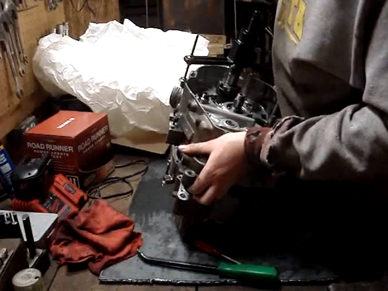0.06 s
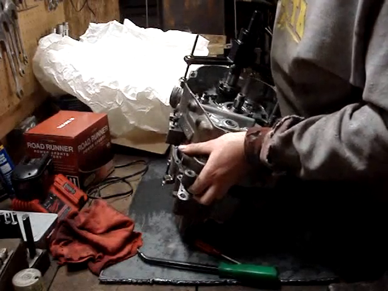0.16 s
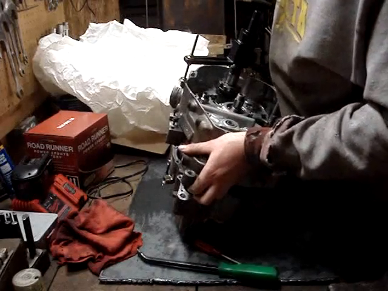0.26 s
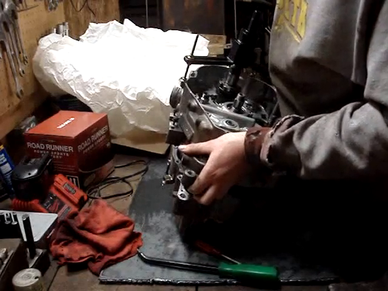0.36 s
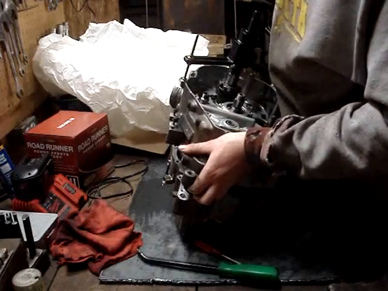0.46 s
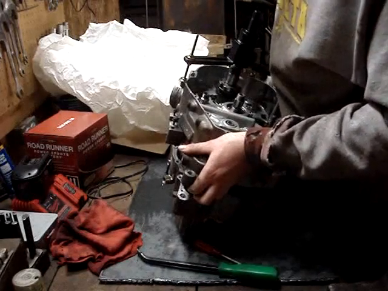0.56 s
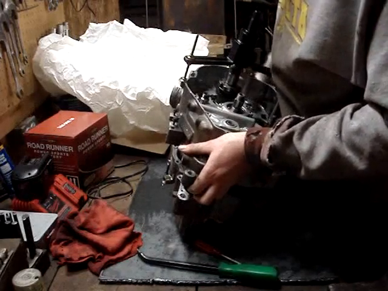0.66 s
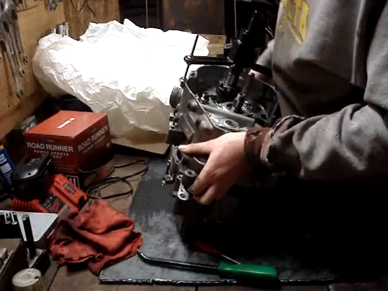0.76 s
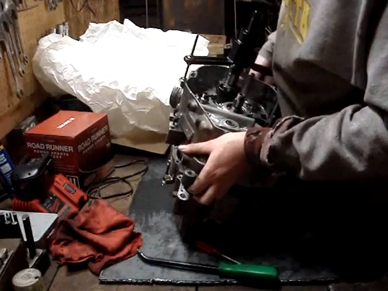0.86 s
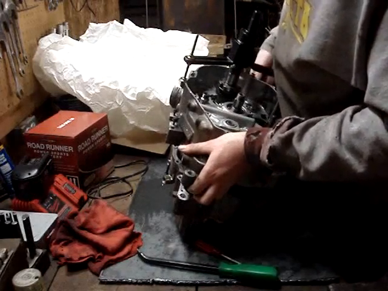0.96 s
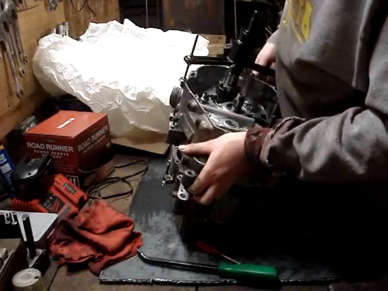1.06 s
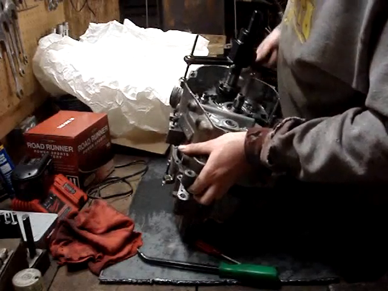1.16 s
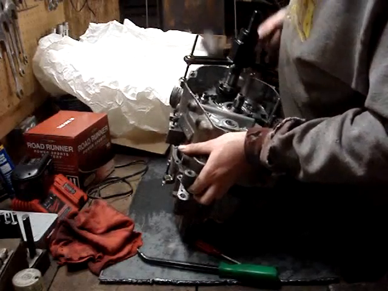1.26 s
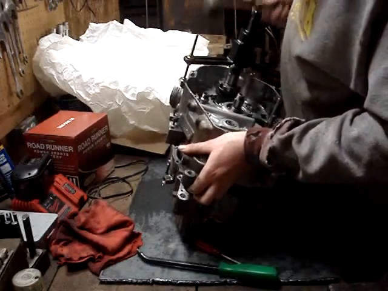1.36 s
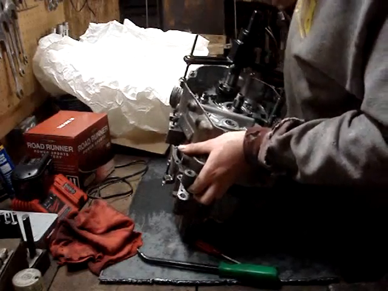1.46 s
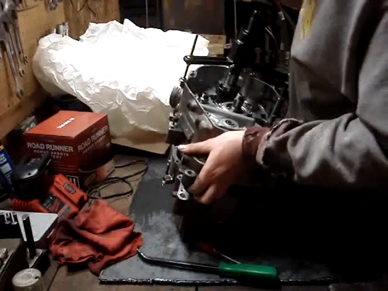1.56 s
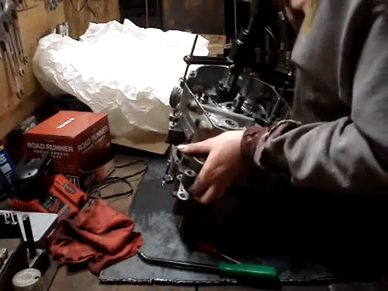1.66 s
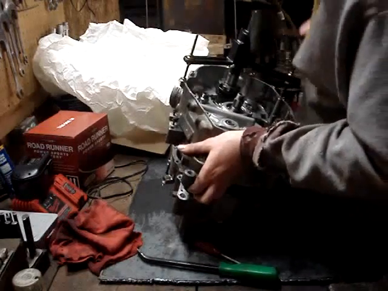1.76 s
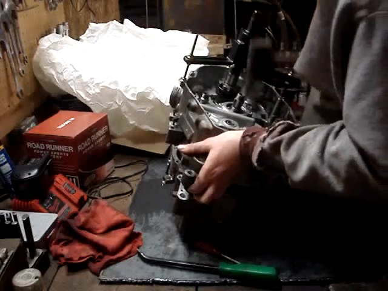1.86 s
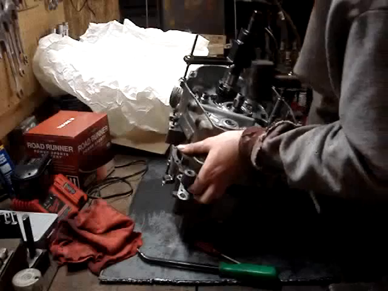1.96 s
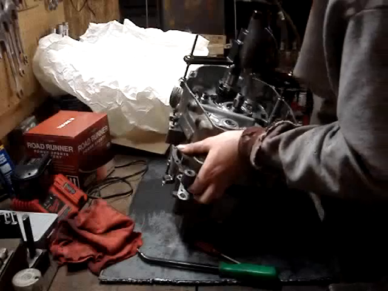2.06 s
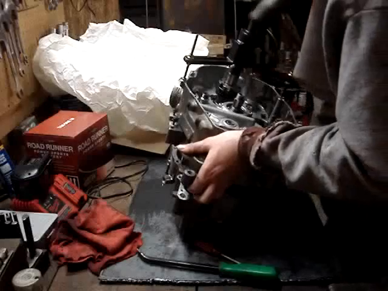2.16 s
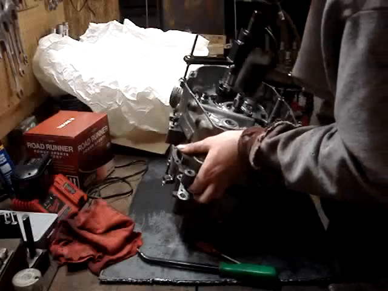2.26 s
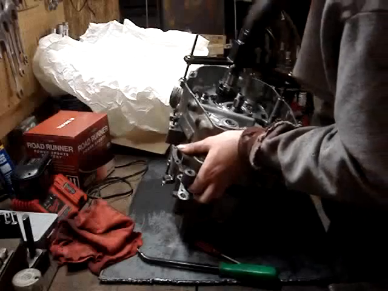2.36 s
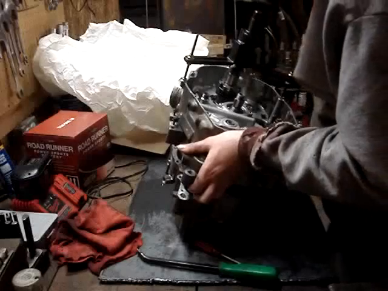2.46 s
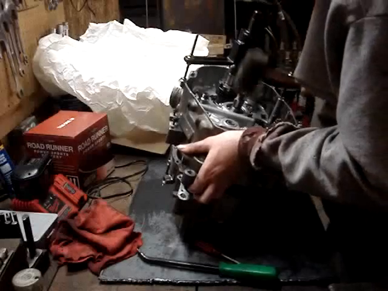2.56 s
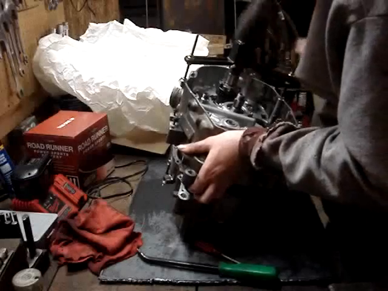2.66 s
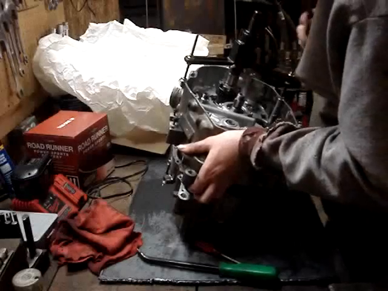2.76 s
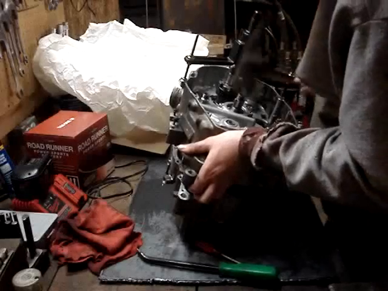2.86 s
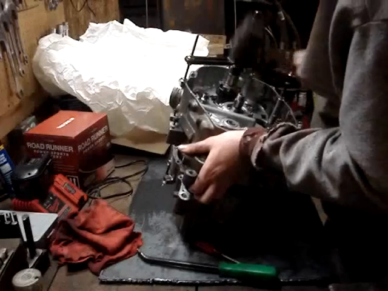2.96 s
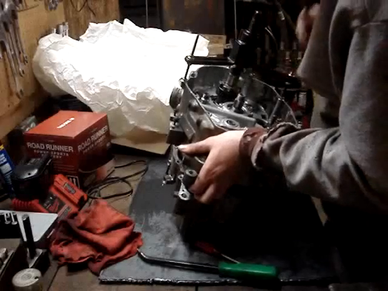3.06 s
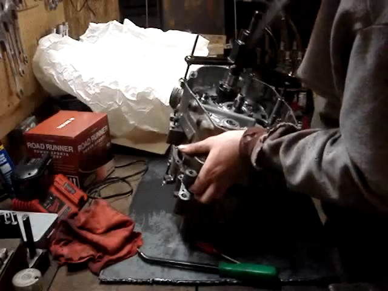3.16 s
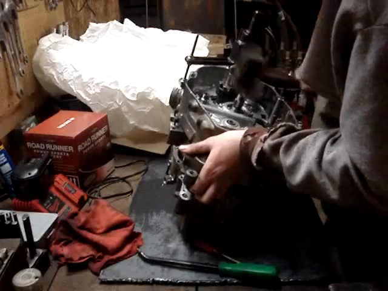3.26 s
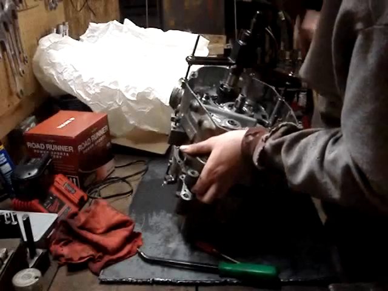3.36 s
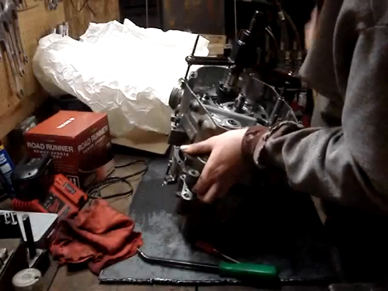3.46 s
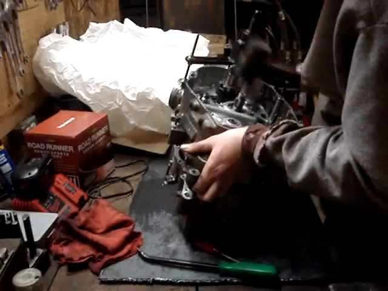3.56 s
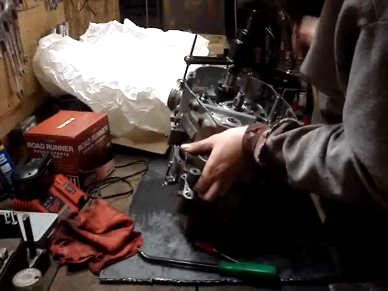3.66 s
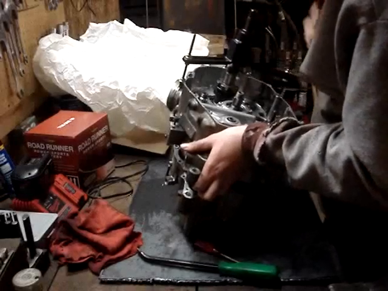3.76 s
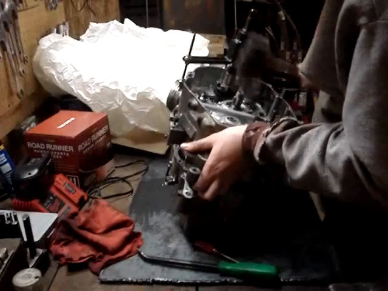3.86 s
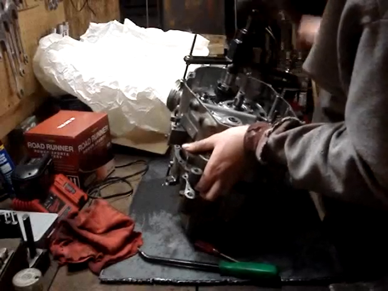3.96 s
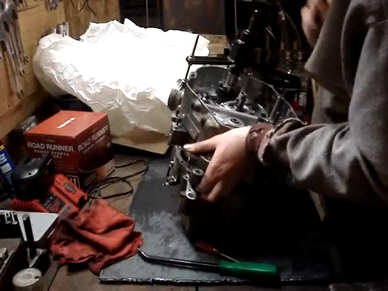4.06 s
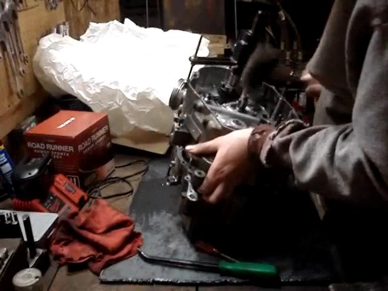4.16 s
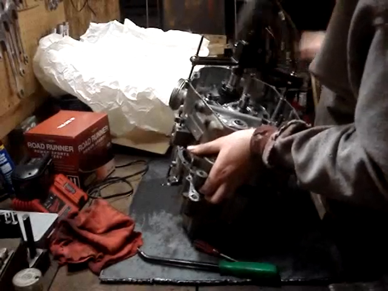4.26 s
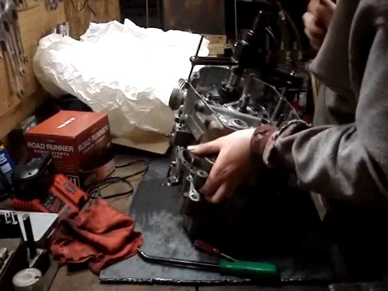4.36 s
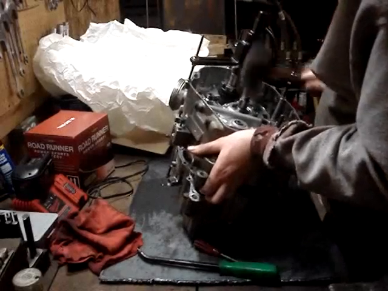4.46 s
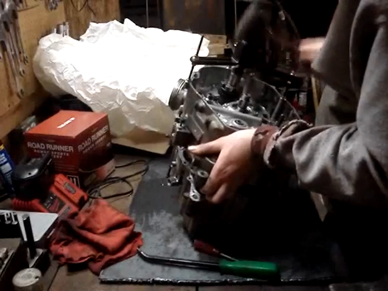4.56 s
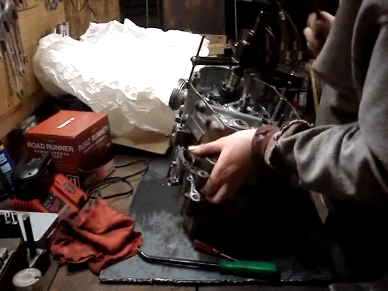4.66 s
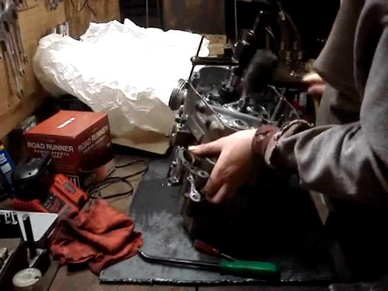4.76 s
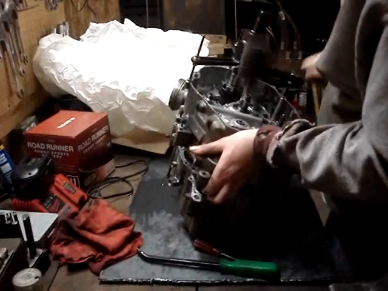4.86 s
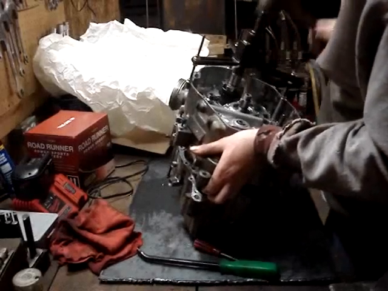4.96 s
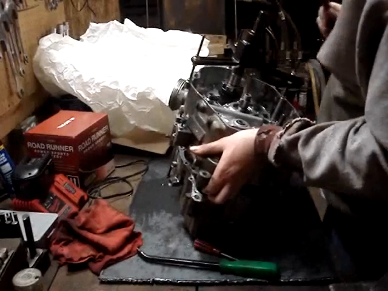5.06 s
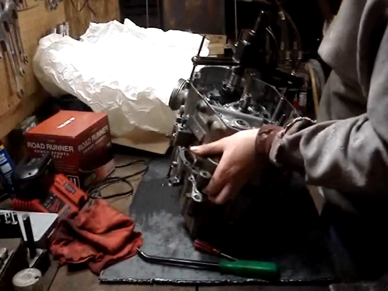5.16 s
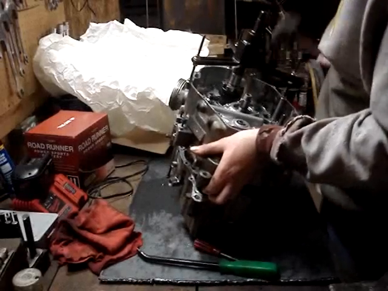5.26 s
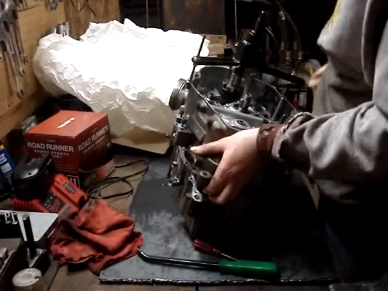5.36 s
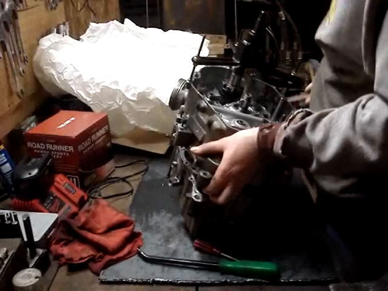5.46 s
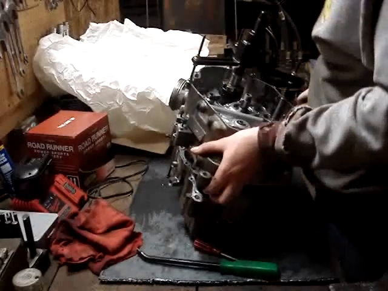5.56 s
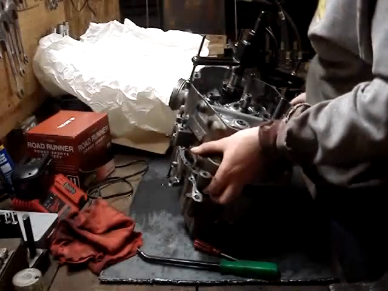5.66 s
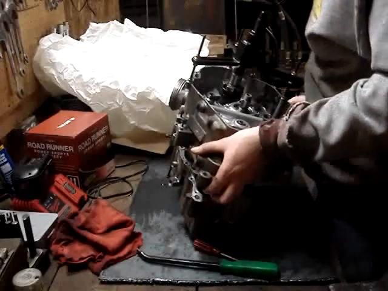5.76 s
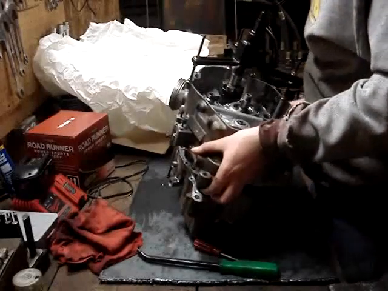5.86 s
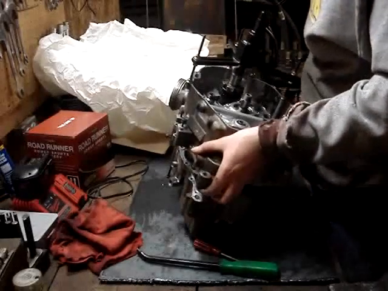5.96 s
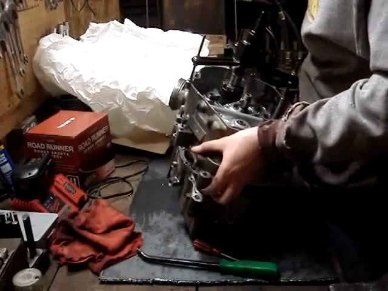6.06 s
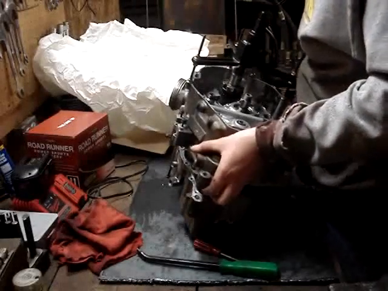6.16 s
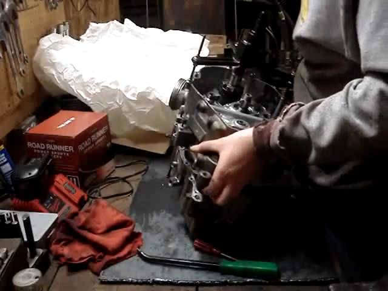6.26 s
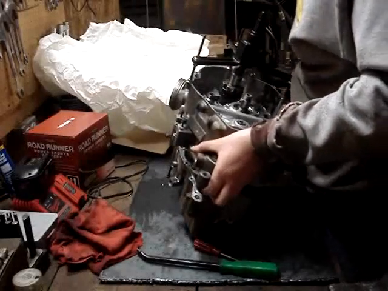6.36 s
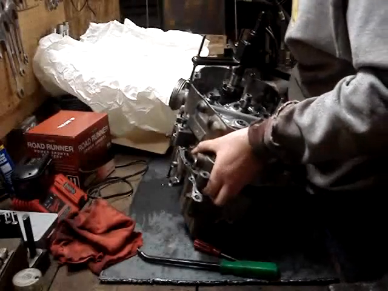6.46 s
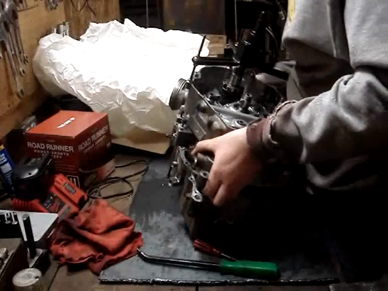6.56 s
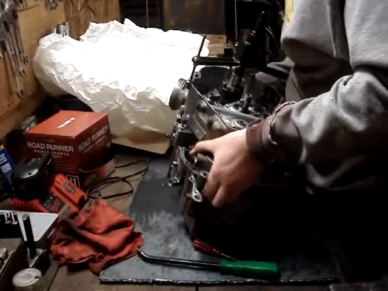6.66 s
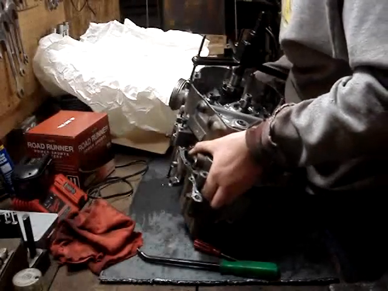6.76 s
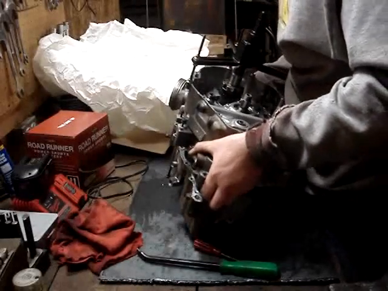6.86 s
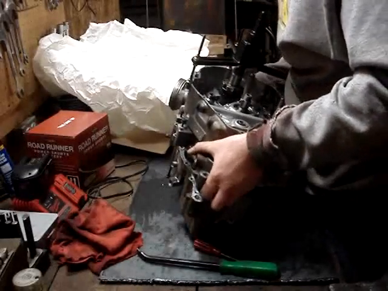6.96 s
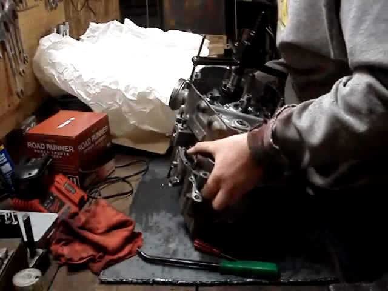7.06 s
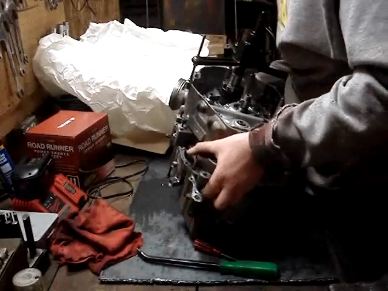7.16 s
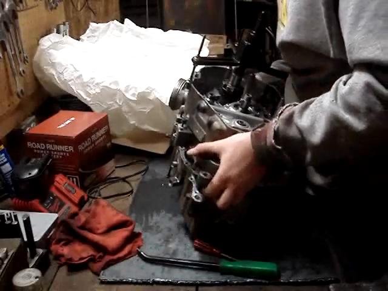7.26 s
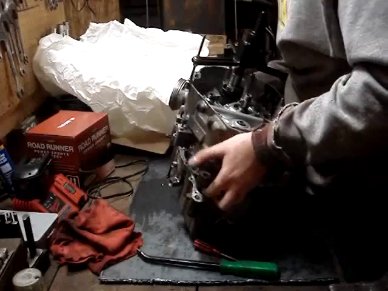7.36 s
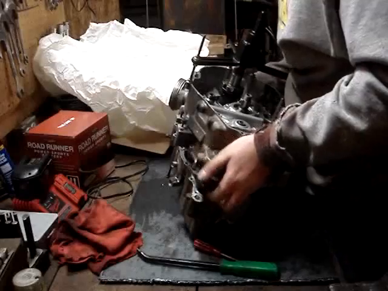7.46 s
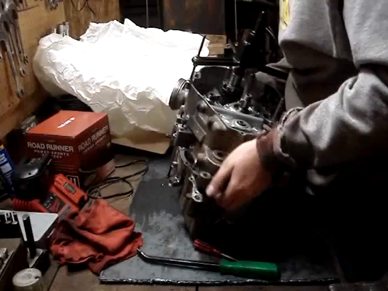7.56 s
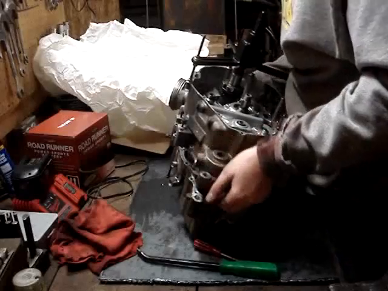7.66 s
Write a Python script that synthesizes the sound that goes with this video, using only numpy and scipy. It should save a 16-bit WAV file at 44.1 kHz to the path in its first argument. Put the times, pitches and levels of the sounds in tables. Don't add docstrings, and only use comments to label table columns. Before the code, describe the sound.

In a garage with a soft heater rush, a steel tool rings on a bench, then a mallet hammers a metal casting in quick, rattling blows.

```python
import sys
import numpy as np
from scipy import signal
from scipy.fft import rfft, irfft, next_fast_len
from scipy.io import wavfile
from scipy.ndimage import uniform_filter1d

SR = 44100
rng = np.random.default_rng(int(sys.argv[2]) if len(sys.argv) > 2 else 0)


def decibels_to_gain(level_db):
    exponent = np.asarray(level_db, float) / 20
    return 10 ** exponent


def master(y):
    cut = np.clip(np.atleast_2d(y).T, -1, 1)
    pcm = np.round(cut * 32767)
    wavfile.write(sys.argv[1], SR, pcm.astype(np.int16))


N = 339834


def unit(x):
    return x / np.sqrt(np.mean(x ** 2) + 1e-20)


def along(points, hz):
    f, v = np.transpose(points)
    return np.interp(np.log(hz + 1), np.log(f + 1), v)


def level_curve(rows):
    s, level_db = np.transpose(rows)
    return decibels_to_gain(np.interp(np.arange(N) / SR, s, level_db))


def filtered(x, response):
    m = next_fast_len(len(x) + 8192)
    return irfft(rfft(x, m) * response(np.fft.rfftfreq(m, 1 / SR)), m)[:len(x)]


def add(track, s, sound):
    part = track[round(s * SR):][:len(sound)]
    part += sound[:len(part)]


def ring(modes, t):
    out = np.zeros(len(t))
    for hz, db, t60 in modes:
        out += decibels_to_gain(db + rng.normal(0, 0.57) - 60 * t / t60) * np.sin(2 * np.pi * hz * t)
    return out


def lag(x, seconds):
    keep = np.exp(-1 / (seconds * SR))
    return np.abs(signal.lfilter([1 - keep], [1, -keep], x))


def stirred_by(loud, seconds):
    return np.sqrt(lag(loud ** 2, seconds))


def patchy(length, size, spread, patchy_db):
    z = signal.stft(rng.standard_normal(length + size), nperseg=size)[2]
    field = uniform_filter1d(rng.standard_normal(z.shape), spread, 0)
    field = uniform_filter1d(field, spread, 1)
    return signal.istft(z * decibels_to_gain(patchy_db * unit(field)), nperseg=size)[1][:length]


def shaped_noise(spectrum):
    return unit(filtered(rng.standard_normal(N), lambda f: decibels_to_gain(along(spectrum, f))))


# freq_hz [Hz], t60_s [s]
GARAGE_DECAY = [(100, 0.15), (260, 0.86), (700, 1), (1840, 0.86), (4850, 0.56), (10000, 0.34)]


def garage(x, wet_db):
    hz, t, z = signal.stft(rng.standard_normal(SR), SR, nperseg=256)
    decay = decibels_to_gain(-60 * t / along(GARAGE_DECAY, hz)[:, None])
    tail = signal.istft(z * decay, SR, nperseg=256)[1]
    tail *= 1 - np.exp(-np.arange(len(tail)) / (0.0079 * SR))
    wet = decibels_to_gain(wet_db) * signal.fftconvolve(x, tail / np.linalg.norm(tail))
    add(wet, 0, x)
    return wet


def camera_gain_db(loud):
    threshold_db, cut_db_per_db, attack_s, release_s = -30.5, 0.96, 0.045, 0.58
    heard = lag(lag(loud ** 2, attack_s), release_s)
    return -cut_db_per_db * 10 * np.log10(1 + heard / decibels_to_gain(threshold_db) ** 2)


# freq_hz [Hz], level_db [dB per Hz]
HEATER_SPECTRUM = [(88, -40), (150, -16.5), (263, -5), (302, 0.5), (337, -2.5), (496, -5), (546, -5),
                   (718, -5), (859, -3), (1570, -10.5), (2040, -22), (4000, -27), (5200, -39), (8800, -120)]


def rush():
    air = patchy(N, size=1024, spread=5, patchy_db=2.5)
    return unit(filtered(air, lambda f: decibels_to_gain(along(HEATER_SPECTRUM, f))))


def heater(gain_db):
    return decibels_to_gain(-37.5 + gain_db) * rush()


# start_s [s], level_db [dB]
HANDLING_LEVEL = [
    (0, -54),
    (.6, -40),
    (1.2, -36.5),
    (1.4, -50),
    (6.2, -65),
    (6.45, -38),
    (6.7, -56),
    (7.1, -40.5),
    (7.71, -47.5),
]


def rustle(loud):
    shudder_db, shudder_s = -18.5, 0.041
    stirred = level_curve(HANDLING_LEVEL) + decibels_to_gain(shudder_db) * stirred_by(loud, shudder_s)
    return stirred * rush()


# freq_hz [Hz], level_db [dB per Hz]
HISS_SPECTRUM = [(1180, -13.5), (2000, -0.5), (2170, -3), (8710, -21), (10100, -27), (10500, -30.5),
                 (13600, -88), (22000, -120)]


def hiss(gain_db, loud):
    sizzle_db, sizzle_s = -29, 0.084
    level = decibels_to_gain(-46.5 + 0.56 * gain_db) + decibels_to_gain(sizzle_db) * stirred_by(loud, sizzle_s)
    return level * shaped_noise(HISS_SPECTRUM)


# freq_hz [Hz], level_db [dB per Hz]
RUMBLE_SPECTRUM = [(12, -20), (20, 0.5), (43, -18), (81, -11), (141, -9), (170, -6), (220, -28),
                   (370, -120)]


def rumble(gain_db):
    return decibels_to_gain(-56.5 + 2.9 * gain_db) * shaped_noise(RUMBLE_SPECTRUM)


def bench_legs(loud):
    boom_db, boom_hz, boom_s = -39.5, 81, 0.017
    noise = rng.standard_normal(N)
    boom = unit(filtered(noise, lambda f: f / boom_hz / (1 + (f / boom_hz) ** 4)))
    return decibels_to_gain(boom_db) * stirred_by(loud, boom_s) * boom


def background(loud):
    gain_db = camera_gain_db(loud)
    return heater(gain_db) + rustle(loud) + hiss(gain_db, loud) + rumble(gain_db) + bench_legs(loud)


# start_s [s], level_db [dB, peak], pitch_hz [Hz]
BENCH_THUDS = [(.5405, -17, 480), (.546, -19, 330), (.552, -21, 650), (.6, -30, 190), (.35, -29, 310),
               (.72, -30, 900), (.8286, -11, 1100), (7.078, -33, 600), (6.298, -24, 270), (6.325, -24, 290),
               (1.056, -17, 180), (1.0616, -17, 180), (1.0672, -19, 180), (1.0551, -2.5, 390),
               (1.0625, -11, 300), (1.068, -12, 420), (1.06, -17, 650), (1.075, -19, 620),
               (1.0712, -8, 330), (1.079, -16, 400)]

# start_s [s], level_db [dB]
DRAG_LEVEL = [
    (6.25, -71),
    (6.36, -60),
    (6.45, -50),
    (6.52, -68),
    (6.6, -69),
]


def bench():
    out, t = np.zeros(N), np.arange(SR // 8) / SR
    for s, db, hz in BENCH_THUDS:
        push = np.sin(2 * np.pi * hz * t) * np.exp(-((t * hz - .9) / 0.77) ** 2)
        add(out, s, decibels_to_gain(db) * garage(push, wet_db=-29.5))
    drag = filtered(rng.standard_normal(N), lambda f: 1 / (1 + ((f - 85) / 20) ** 2))
    return out + level_curve(DRAG_LEVEL) * unit(drag)


# level_db [dB], t60_s [s], brightness
# [dB per octave], favoured_hz [Hz]
SHAKEN_PARTS = [(-10.5, 0.26, .5, 3500), (-15, 0.044, -5.5, 2000), (-11, 0.14, -1.5, 3150),
                (-12.5, 0.3, 1, 3700), (-12, 0.16, 2.5, 2380), (-11, 0.2, -0.1, 3150),
                (-12, 0.25, -2, 3550), (-14.5, 0.41, 0, 3400), (-12.5, 0.21, -3, 2540),
                (-12.5, 0.28, -2, 3600), (-22, 0.51, -3, 3700), (-11, 0.16, -1.5, 1600)]

# start_s [s], level_db [dB], t60_s [s], favoured_hz [Hz]
LANDINGS = [(1.114, -13, 0.36, 5930), (1.149, -18, 0.25, 2840), (2.411, -21, 0.13, 3240),
            (2.74, -16.5, .15, 4550), (3.058, -16.5, 0.28, 5400), (3.388, -20, 0.43, 2640),
            (3.706, -16.5, 0.47, 2580), (4.023, -19.5, 0.39, 5600), (4.327, -14, 0.12, 2150),
            (4.362, -17.5, 0.27, 5720), (4.639, -15.5, 0.35, 6440), (4.663, -22, 0.11, 5100),
            (4.941, -19.5, 0.26, 5600), (6.309, -18, 0.13, 5730), (6.322, -19, 0.12, 4200),
            (6.345, -24, 0.18, 5640), (6.537, -29, 0.083, 1300)]

# start_s [s], level_db [dB], brightness [dB per octave], favoured_hz [Hz]
STRAY_TICKS = [
    (.408, -38, -4, 4000),
    (.548, -26, -7.5, 2130),
    (0.827, -43, 0, 6460),
    (1.062, -36.5, 6, 5040),
    (7.64, -40, 6.5, 7850),
]


def chatters():
    clumps = []
    for blow, (db, *rest) in zip(BLOWS_STRUCK, SHAKEN_PARTS):
        clumps.append((blow[0], db, 0.02, *rest))
    for s, db, t60, hz in LANDINGS:
        tilt_db = 0.34 + 1.9 * np.log2(hz / 4000)
        clumps.append((s, db, .021, t60, tilt_db, hz))
    for s, db, *rest in STRAY_TICKS:
        clumps.append((s, db, 0.0067, 0.11, *rest))
    return clumps


# freq_hz [Hz], level_db [dB per Hz]
CHATTER_SPECTRUM = [(88, -49), (150, -27), (511, -7.5), (579, -3.5), (704, -3), (1310, -4.5), (1540, -2),
                    (4890, -6), (9440, -20), (10500, -30), (13600, -55), (22000, -120)]

# freq_hz [Hz], width_hz [Hz], level_db [dB over the chatter]
CASTING_MODES = [(581, 22, 3), (913, 30, -2), (1297, 40, -1), (1850, 40, -6), (2145, 18, -2),
                 (2500, 36, -6), (2737, 30, -4), (3060, 34, -5), (3600, 30, -4), (3896, 25, -3),
                 (4333, 30, -3), (4806, 36, 0), (5430, 30, -5), (5810, 30, -4), (6008, 22, -4),
                 (6359, 40, -2), (7520, 40, -5), (9500, 700, -6)]


def rattle():
    favour_db, favour_octaves = 4.5, 0.14
    out, t = np.zeros(N), np.arange(SR // 2) / SR
    centre, width, level_db = np.transpose(CASTING_MODES)[..., None]
    for s, db, hold, t60, tilt_db, favoured_hz in chatters():
        def favour(f):
            return favour_db * np.exp(-(np.log2((f + 1) / favoured_hz) / favour_octaves) ** 2)

        fed_db = level_db + rng.normal(0, 1.5, level_db.shape) + favour(centre)

        def body(f):
            band = 1j * f * width
            return 1 + np.sum(decibels_to_gain(fed_db) * band / (centre ** 2 - f * f + band), axis=0)

        def colour(f):
            tilt = tilt_db * np.log2((f + 50) / 2000)
            return decibels_to_gain(along(CHATTER_SPECTRUM, f) + tilt + favour(f))

        taps = unit(filtered(patchy(len(t), size=256, spread=4, patchy_db=2.5), colour))
        shape = (1 - np.exp(-t / 0.00086)) * decibels_to_gain(-60 * np.clip(t - hold, 0, None) / t60)
        add(out, s, decibels_to_gain(db - 3.5) * garage(filtered(taps * shape, body), wet_db=-9.0))
    return out


# freq_hz [Hz], beat_hz [Hz], t60_s [s], share [second part over first, before
TOOL_MODES = [(910, 10.5, .45, .6), (1195, 12.3, .9, .7), (2278, 9, 1.0, .12), (2690, 8, .4, .5)]

# start_s [s], mode1_db, mode2_db, mode3_db [dB], knock_db [dB]
TOOL_NUDGES = [
    (.528, -53, -52, -28, -49),
    (.542, -15, -55, -27.5, -21),
    (.828, -13, -11.5, -31, -11.5),
    (6.325, -52, -19, -53, -49),
]


def tool():
    out, t = np.zeros(N), np.arange(SR // 2) / SR
    dull_modes = [(339, -16.5, 0.071), (625, -16, 0.06), (1034, 7, 0.015), (1300, -15.0, 0.042)]
    for s, *levels, knock_db in TOOL_NUDGES:
        levels = [*levels, min(levels) - 2.5]
        sound = decibels_to_gain(knock_db) * ring(dull_modes, t)
        for db, (hz, beat_hz, t60, share) in zip(levels, TOOL_MODES):
            second = min(share, 1) * np.exp(2j * np.pi * beat_hz * (t - .031))
            carrier = np.exp(2j * np.pi * (hz - beat_hz * share) * t)
            cluster = np.imag(carrier * (1 + second) ** 2 / 2)
            sound += decibels_to_gain(db - 7.5 - 60 * t / t60) * cluster
        add(out, s, garage(sound * (1 - np.exp(-t / .0005)), wet_db=-20))
    return out


# [Hz, bench]
BLOWS_STRUCK = [(1.086, -9, -28, -20, 637), (2.403, -8, 0.5, -0.5, 527), (2.702, 3.5, -10, -10, 563),
                (3.022, 7.5, -24, -12.5, 617), (3.346, 12.5, -26.5, -20.5, 474), (3.676, -2, -15, -2, 650),
                (3.99, 3.5, -10.5, -2, 613), (4.3018, -0.5, -6, -0.5, 630), (4.614, -1, -7, -1, 626),
                (4.907, 7, -14, -8, 615), (6.279, -24, 6.5, -5, 516), (6.496, 2.5, -30, -5.5, 610)]

# multiple [of the bench pitch], level_db [dB], t60_s [s]
BENCH_KNOCK_MODES = [(.55, -14, 0.13), (.84, 0.5, 0.017), (.93, -3, 0.1), (1, 0, .07), (1.14, -6, 0.061)]

# freq_hz [Hz], level_db [dB], t60_s [s]
CASTING_KNOCK_MODES = [(910, -7, .06), (1215, -3, .06), (1290, 0, .06), (1335, -6, .04), (1620, -10, .03),
                       (1830, -13, .03)]


def mallet():
    jolt_rise_s, jolt_fall_s = 0.0025, 0.028
    thin_below_hz = 161
    out, jolts, t = np.zeros(N), np.zeros(N), np.arange(SR // 4) / SR
    for s, db, bench_db, cast_db, pitch_hz in BLOWS_STRUCK:
        knock = decibels_to_gain(bench_db - 4.5) * ring(BENCH_KNOCK_MODES * np.array([pitch_hz, 1, 1]), t)
        knock += decibels_to_gain(cast_db - 8.5) * ring(CASTING_KNOCK_MODES, t)
        crack = decibels_to_gain(-13.5 - 60 * t / 0.0067) * rng.standard_normal(len(t))
        onset = 1 - np.exp(-t / 0.0013)
        add(out, s, decibels_to_gain(db) * garage((crack - knock) * onset, wet_db=-4))
        swing = (t - .0017) / .00016
        add(out, s, -decibels_to_gain(min(db, -3) + 1) * (1 - swing ** 2) * np.exp(-swing ** 2))
        jolt_db = -14 - 6 * s + 2 * min(db + 8, 0)
        add(jolts, s, decibels_to_gain(jolt_db) * np.exp(-t / jolt_fall_s) * (1 - np.exp(-t / jolt_rise_s)))
    return jolts + filtered(out, lambda f: (1j * f / (thin_below_hz + 1j * f)) ** 2)


# freq_hz [Hz], level_db [dB], t60_s [s]
PIN_MODES = [(3890, -6, .1), (4806, 0, .12), (5810, -6, .1), (6360, -10, .1)]

# start_s [s], level_db [dB]
PIN_CLINKS = [
    (2.745, -20),
    (3.043, -21.5),
    (3.072, -18),
    (4.03, -28),
    (4.368, -14),
    (4.669, -18),
    (4.945, -22),
]


def pin():
    out, t = np.zeros(N), np.arange(SR // 5) / SR
    for s, db in PIN_CLINKS:
        add(out, s, decibels_to_gain(db) * ring(PIN_MODES, t) * (1 - np.exp(-t / 0.00092)))
    return garage(out, wet_db=-17)[:N]


def scene():
    work = bench() + rattle() + tool() + mallet() + pin()
    return (work + background(work))[None]


def top_cut(x):
    return signal.sosfilt(signal.butter(12, 11340, fs=SR, output="sos"), x)


# start_s [s], length_s [s], above_hz [Hz], change_db
# [dB]
TREBLE_DROPOUTS = [(1.041, 0.013, 4470, -24), (2.375, 0.023, 1730, -16), (2.97, .035, 5500, -4),
                   (3.65, 0.02, 5000, -3), (3.956, 0.029, 4370, -20), (4.281, 0.018, 1730, -17),
                   (4.604, 0.008, 4470, -8), (4.895, 0.01, 1980, -20), (6.262, 0.0192, 3000, -28),
                   (6.476, 0.017, 1730, -21), (7.62, .012, 4970, 2)]


def record(dry):
    overload_low_hz, top_hz = 150, 10075
    top = np.where(dry[0] > 0, .62, .95)
    bent = dry[0] / (1 + np.abs(dry[0] / top) ** 4) ** .25
    x = dry[0] + filtered(bent - dry[0], lambda f: 1 / (1 + (overload_low_hz / (f + 1)) ** 4))
    t = np.arange(N) / SR
    for s, length, above_hz, change_db in TREBLE_DROPOUTS:
        gate = uniform_filter1d(((t > s) & (t < s + length)) * 1., size=90)
        treble = filtered(gate * x, lambda f: 1 / (1 + (above_hz / (f + 1)) ** 16))
        x = x - (1 - decibels_to_gain(change_db)) * treble
    x = filtered(x, lambda f: 1 / (1 + (f / top_hz) ** 150))
    return top_cut(x[None])


dry = scene()
out = record(dry)
master(out)
```